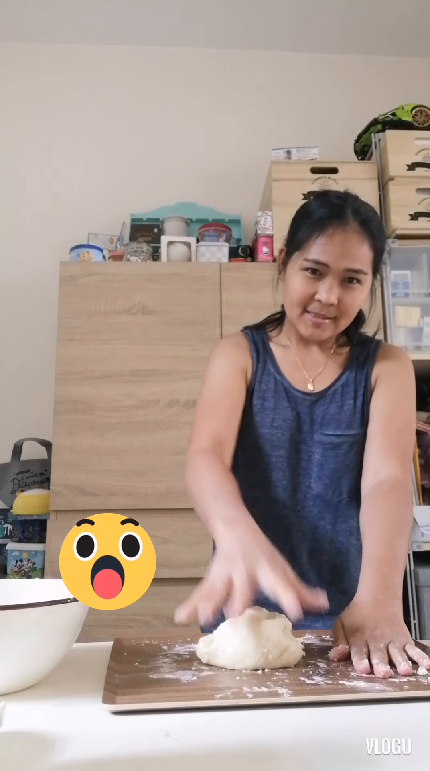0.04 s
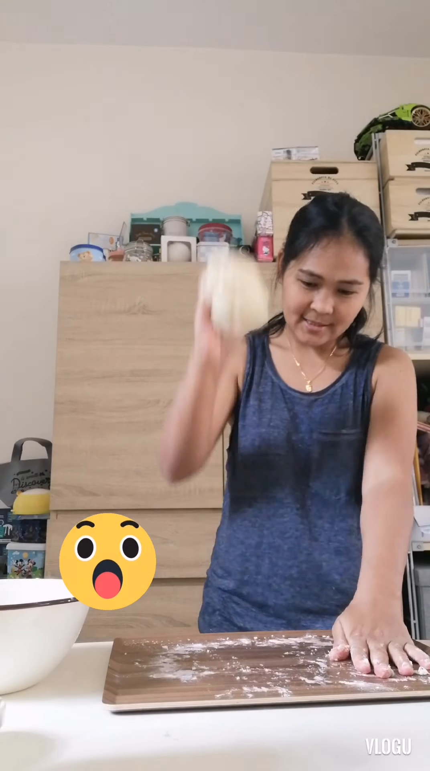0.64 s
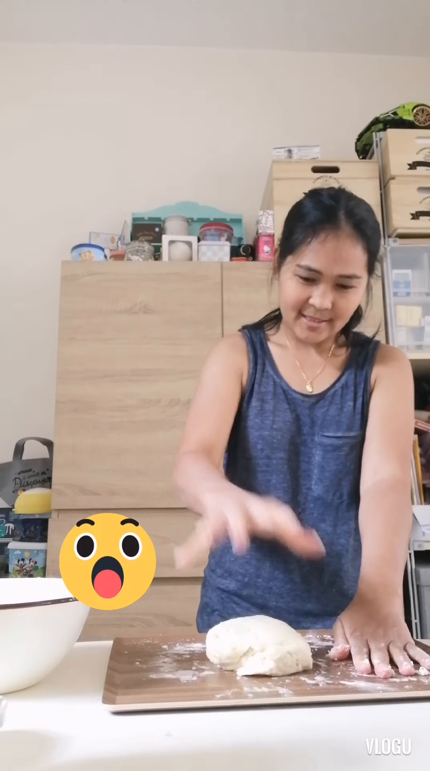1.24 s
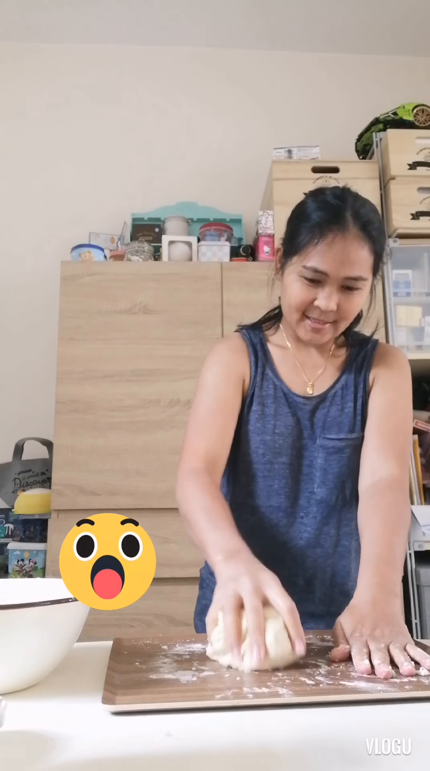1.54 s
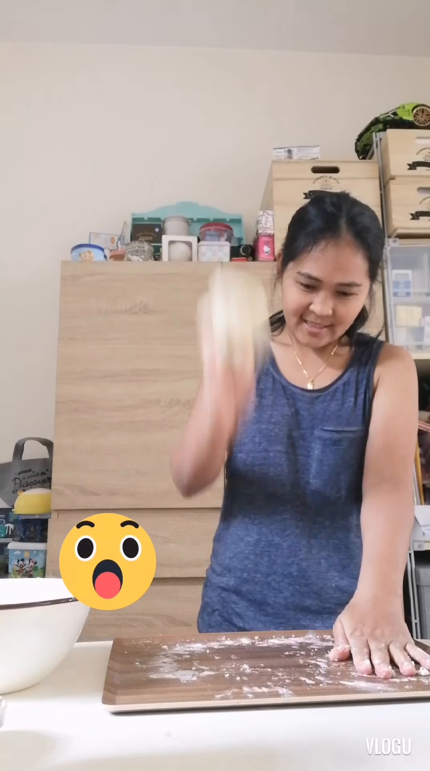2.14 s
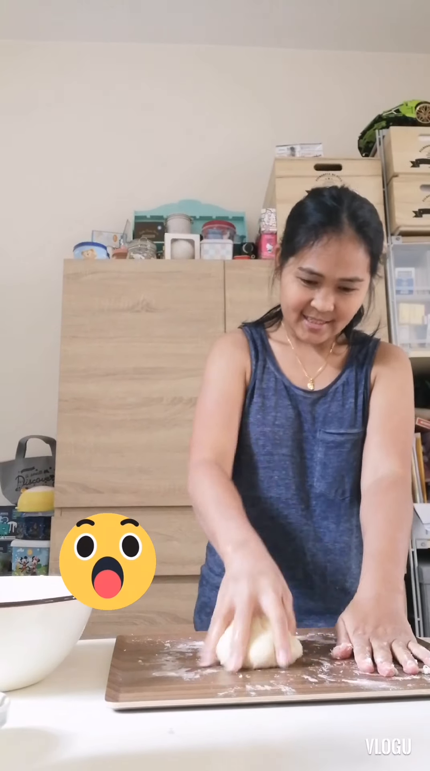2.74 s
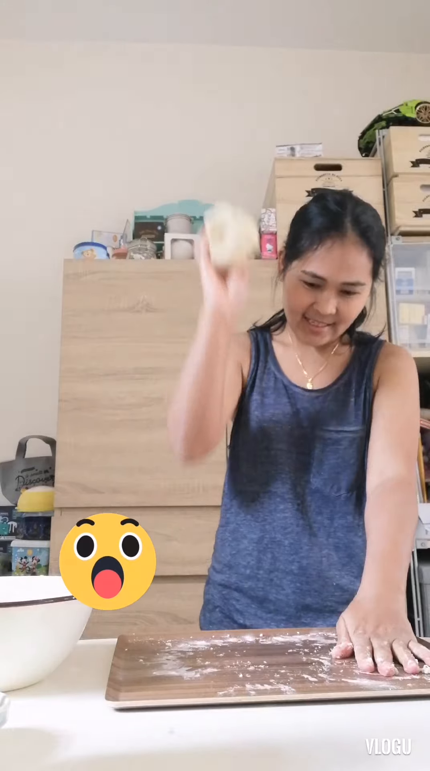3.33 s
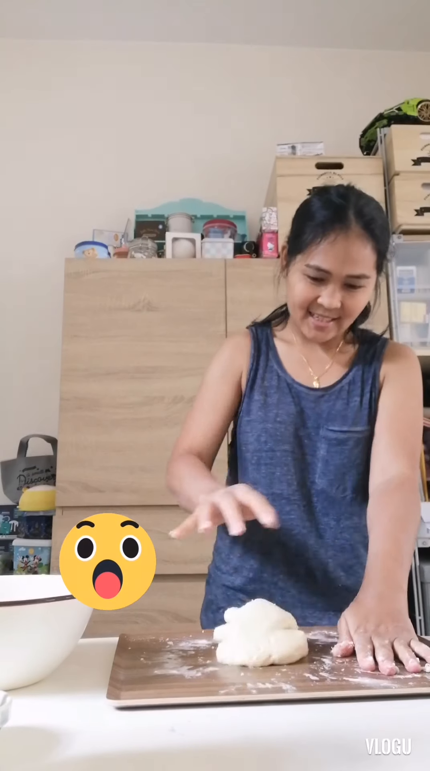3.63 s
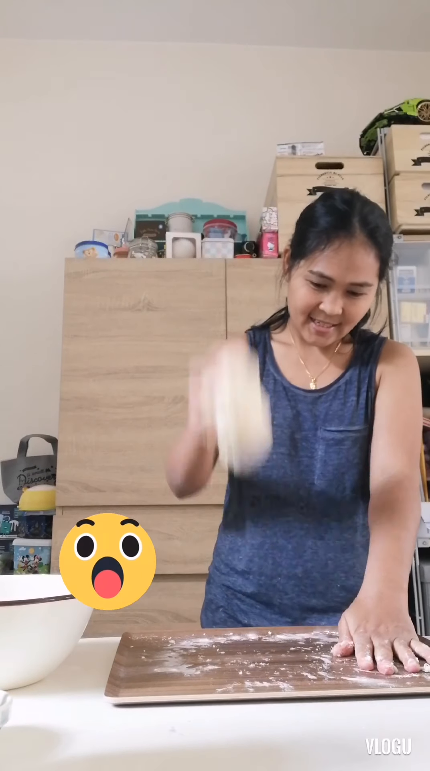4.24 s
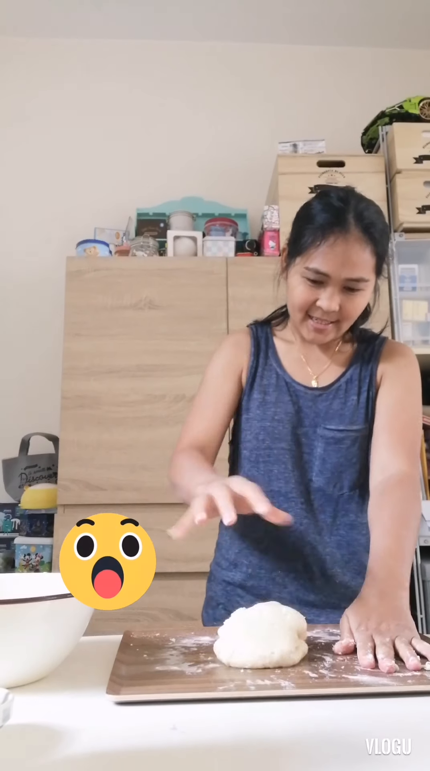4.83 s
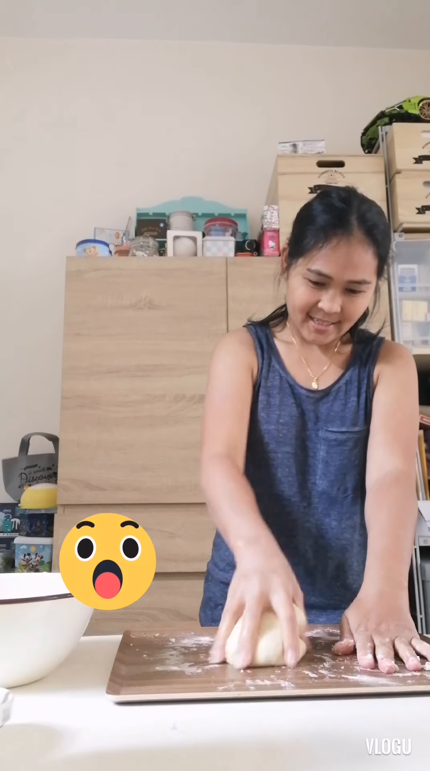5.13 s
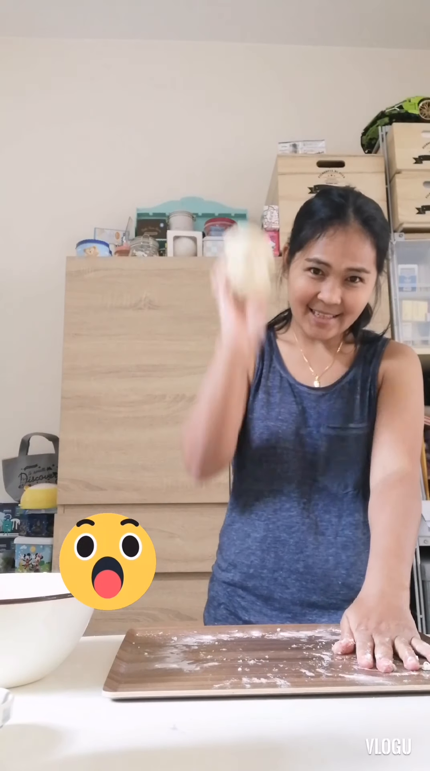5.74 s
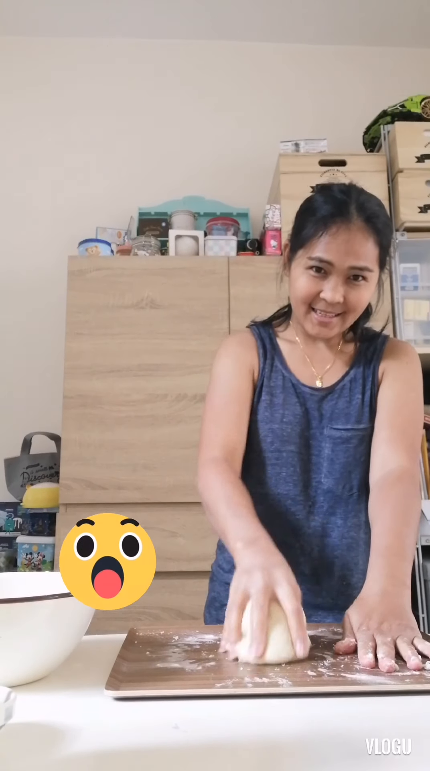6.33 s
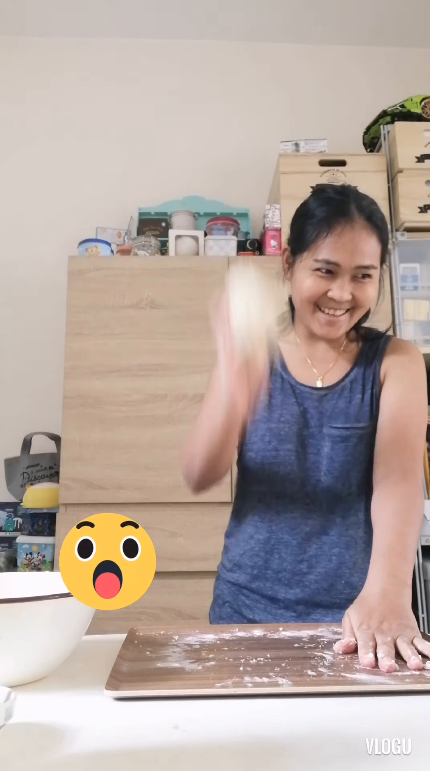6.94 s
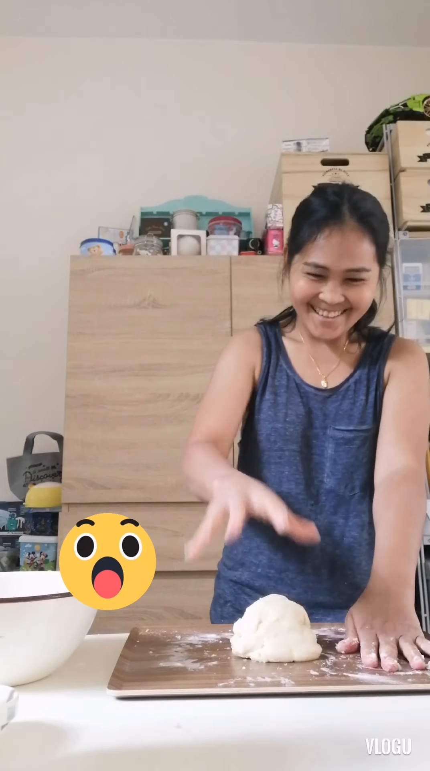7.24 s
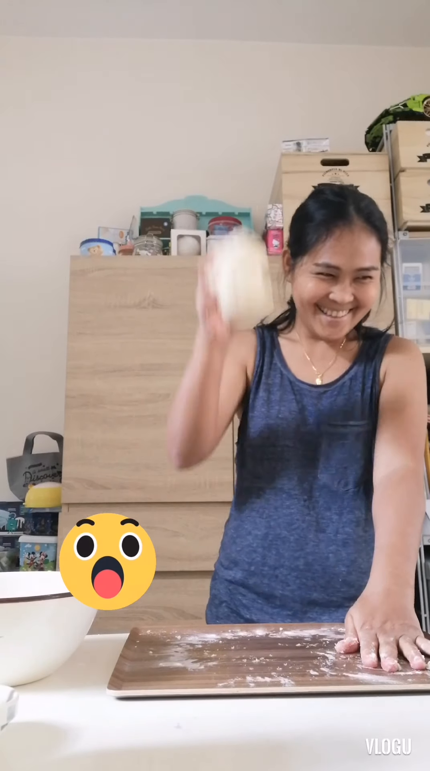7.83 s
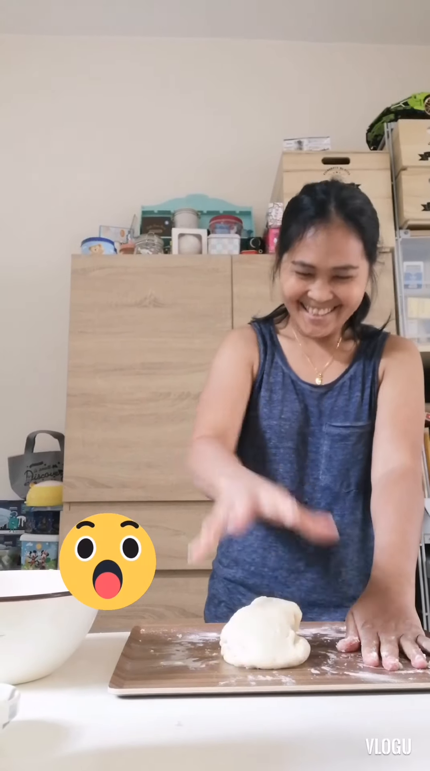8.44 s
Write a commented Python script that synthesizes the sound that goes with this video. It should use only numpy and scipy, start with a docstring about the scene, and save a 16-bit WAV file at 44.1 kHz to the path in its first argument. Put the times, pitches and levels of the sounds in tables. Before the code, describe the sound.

Sharp, heavy slaps of dough hit a wooden board about once a second, with faint sticky peeling between throws.

```python
"""A hard-walled kitchen, a phone microphone close to a floured wooden board, over low murmur, hum and hiss.
A lump of soft dough is thrown down about every 1.2 s. Each slap is a crack of trapped air plus a heavy
push that rings board, table and, faintly, a mixing bowl; the room answers and the input overloads.
Between throws the fingers grip the dough and peel it off, now and then knocking the board."""
import sys
import numpy as np
from scipy import signal
from scipy.fft import rfft, irfft
from scipy.io import wavfile

SR = 44100
rng = np.random.default_rng(int(sys.argv[2]) if len(sys.argv) > 2 else 0)


def master_out(mix):
    """Clip the mix to full scale and print it as 16-bit PCM to the path in sys.argv[1]."""
    frames = np.transpose(np.atleast_2d(mix))
    ceiling = np.clip(frames, -1, 1)
    pcm = np.round(ceiling * 32767).astype(np.int16)
    wavfile.write(sys.argv[1], SR, pcm)


N = 373527
LEAD = SR // 2  # samples of run-up before the start

# Landings of the dough, the first just before the start:
# start_s, crack_db, push_db, crack_tilt_db_per_octave, thud_tilt_db_per_octave, bowl_db
THROWS = [(-0.135, -6, -9, 2, 0.5, -54.5), (1.1421, -5, -12, 2.5, 1, -53.5),
          (2.3499, -4, -9, 2.5, 0.5, -45.5), (3.595, -6, -9.5, 1.5, -0.5, -51.5),
          (4.7877, -6.5, -9.5, 2, 0.5, -47), (5.9853, -7, -11, 1.38, 0, -52.5),
          (7.1371, -4, -13, 2.1, 0, -55.5), (8.308, -6, -11, 1.5, -0.8, -54)]
# The board on its table; the two slow low modes beat: pitch_hz, level_db, t60_s
BOARD_MODES = [(53.6, -2.5, 0.2), (71, -11, 0.66), (78.5, -17.5, 0.41), (104, -3, 0.052),
               (198.5, -1.5, 0.14), (295, 1, .15), (402, -4, 0.067), (442, -7, 0.38), (497.5, -1.5, 0.23),
               (583, -1.5, 0.14), (621.5, 4, 0.17), (660, 1.5, .14), (726, -1, 0.15), (1241, -1, 0.22)]


def amp(db):
    """Decibels to gain."""
    return 10 ** (np.asarray(db) / 20)


def read(points, hz):
    """Join (frequency_hz, value) points on a log-frequency axis."""
    corner_hz, value = np.transpose(points)
    return np.interp(np.log(np.maximum(hz, 1)), np.log(corner_hz), value)


def unit(x):
    """Scale to unit energy."""
    return x / np.sqrt(np.sum(x ** 2))


def burst(x, db):
    """Scale a short sound to the energy of 30 ms at this level."""
    return unit(x) * amp(db) * np.sqrt(0.03 * SR)


def add(track, start_s, x):
    """Mix a sound into a track that begins with the run-up."""
    i = max(LEAD + int(start_s * SR), 0)
    track[i:i + len(x)] += x[:len(track) - i]


def colour(x, spectrum, tilt_db=0, size=4096):
    """Minimum-phase filter with this spectrum, tilted by tilt_db per octave around 2 kHz."""
    hz = np.maximum(np.fft.rfftfreq(size, 1 / SR), 20)
    gain = amp(read(spectrum, hz) + tilt_db * np.log2(hz / 2000))
    cepstrum = irfft(np.log(gain))
    cepstrum[1:size // 2] *= 2
    cepstrum[size // 2 + 1:] = 0
    response = irfft(np.exp(rfft(cepstrum)))
    return signal.fftconvolve(x, response)[:len(x)]


def swell(t, peak_s, rise_s, hold_s, fade_s):
    """Exponential rise up to peak_s, hold, fade."""
    rising, fading = (peak_s - t) / rise_s, (t - peak_s - hold_s) / fade_s
    return np.exp(-np.maximum(np.maximum(rising, fading), 0))


def room_tone(noise_db=-61):
    """Steady room murmur and microphone hiss, with a faint, slightly wandering motor hum."""
    # Still room and microphone hiss: frequency_hz, relative_db
    noise_spectrum = [(15, -34), (25, -2), (49, -11), (75, -4), (98, -11), (125, -4.5), (164, -4.5),
                      (246, -16), (281, -10), (305, -16), (871, -21), (1020, -27), (1110, -25), (1620, -32),
                      (5280, -38), (8000, -32), (9100, -26), (10200, -35), (15500, -42)]
    # Motor tones: pitch_hz, level_db
    motor_tones = [(119, -68.5), (166, -74.5)]
    t, hum = np.arange(N) / SR, 0
    for hz, db in motor_tones:
        phase_drift = 0.0066 * np.cumsum(rng.standard_normal(N))
        hum += amp(db) * np.sqrt(2) * np.sin(2 * np.pi * hz * t + phase_drift)
    noise = colour(rng.standard_normal(N), noise_spectrum)
    return amp(noise_db) * np.sqrt(N) * unit(noise) + hum


def ticking(per_s=55, level_db=-74):
    """The hiss ticks faintly and irregularly in the high treble."""
    # One tick: frequency_hz, relative_db
    tick_spectrum = [(4000, -34.5), (7000, -10), (9000, 1), (11000, -1.5), (15000, -14.5)]
    ticks = 1.0 * (rng.random(N) < per_s / SR)
    return amp(level_db) * np.sqrt(N) * unit(colour(ticks, tick_spectrum))


def wall_reflections(build_s=0.0039):
    """Dense reflections off hard walls build up quickly and die band by band; unit energy."""
    # Kitchen reverberation: frequency_hz, t60_s
    decay_times = [(60, 0.26), (160, 0.29), (420, 0.25), (1100, 0.37), (2900, .42), (6000, 0.45),
                   (8000, 0.33), (11000, 0.34), (16000, 0.03)]
    t, hz = np.arange(SR) / SR, np.fft.rfftfreq(SR, 1 / SR)
    centres_hz = np.geomspace(40, 18000, 20)
    noise, tail = rfft(rng.standard_normal(SR)), 0
    for centre, weights in zip(centres_hz, np.eye(len(centres_hz))):
        band = irfft(noise * read(np.c_[centres_hz, weights], hz), SR)
        tail += band * np.exp(-np.log(1000) * t / read(decay_times, centre))
    return unit(tail * (1 - np.exp(-t / build_s)))


def sticky_crackle(count, grain_db, tilt_db):
    """Tiny sticky bonds of uneven size snap in a dense stream; rms 1."""
    # Peeling dough: frequency_hz, relative_db
    peel_spectrum = [(200, -11), (700, 2), (1500, -1), (3500, -4), (6000, 5), (9000, -2.5), (15000, -7)]
    snaps = rng.standard_normal(count) * (rng.random(count) < 0.25)
    sizes = amp(grain_db * np.minimum(rng.exponential(size=count), 4))
    return unit(colour(snaps * sizes, peel_spectrum, tilt_db)) * np.sqrt(count)


def fingers_on_dough(rub_db=-9, slide_db=-60.5, slips_per_s=30, slip_db=0.5, snap_s=0.0017):
    """Fingers sink in and rub; the dough peels off with a snap, then slides from the hand as it lands."""
    # Pick-ups of the dough: tear_s, tear_db, held_s, press_db, snap_db
    pickups = [(.532, -60.5, 0.17, -54, -63), (1.7795, -55.5, 0.16, -54.5, -57),
               (3.041, -60, 0.22, -54.5, -59), (4.228, -58.5, .07, -56, -64),
               (5.441, -54.5, .17, -53, -60.5), (6.564, -56, .13, -57, -61), (7.72, -53, 0.148, -54.5, -65)]
    # A bond letting go: frequency_hz, relative_db
    snap_spectrum = [(300, -14), (1500, -11.5), (3800, -14), (6000, 1.5), (9000, -8.5), (15000, -16)]
    t, snap_t = np.arange(-LEAD, N) / SR, np.arange(SR // 10) / SR
    pressing, rubbing, peeling, snaps = np.zeros((4, len(t)))
    for tear_s, tear_db, held_s, press_db, snap_db in pickups:
        press_s = tear_s - held_s
        pressing += amp(press_db) * swell(t, press_s, rise_s=0.033, hold_s=0, fade_s=0.018)
        rubbing += amp(press_db + rub_db) * swell(t, press_s, rise_s=0.03, hold_s=held_s, fade_s=0.03)
        peeling += amp(tear_db) * swell(t, tear_s, rise_s=0.018, hold_s=0.026, fade_s=0.021)
        snap = rng.standard_normal(len(snap_t)) * np.exp(-snap_t / snap_s)
        add(snaps, tear_s, burst(colour(snap, snap_spectrum), snap_db))
    sliding = sum(swell(t, land_s, rise_s=0.04, hold_s=0, fade_s=0.021) for land_s, *_ in THROWS)
    slip_times = t[::SR // slips_per_s]  # the fingers catch and slip
    rubbing *= amp(slip_db * np.interp(t, slip_times, rng.standard_normal(len(slip_times))))
    touch = np.hypot(pressing + amp(slide_db) * sliding, rubbing)
    gripping = touch * sticky_crackle(len(t), grain_db=1, tilt_db=0.33)
    tearing = peeling * sticky_crackle(len(t), grain_db=3, tilt_db=-1.1)
    return gripping + tearing + snaps


def ring(modes, t, scatter_db):
    """Struck modes decay; where the blow lands changes the share of each."""
    shares_db = scatter_db * rng.standard_normal(len(modes))
    ringing = 0
    for k, (hz, db, t60_s) in enumerate(modes):
        decay = np.exp(-np.log(1000) * t / t60_s)
        ringing += (-1) ** k * amp(db + shares_db[k]) * np.sin(2 * np.pi * hz * t) * decay
    return ringing


def contact(t, spread_s, splatter_db):
    """One sharp impact, then a splatter of small ones as the contact spreads."""
    splatter = unit(rng.standard_normal(len(t)) * np.exp(-t / spread_s))
    return (t == 0) + amp(splatter_db) * splatter


def board_knocks(wood_db=-12, hand_damping_s=0.023, nearby_db=-8, scatter_s=0.018):
    """Dry taps on the board, damped by the hand and scattered by the things on the table."""
    # Light knocks as the dough is picked up: start_s, level_db
    taps = [(2.759, -63), (2.956, -67), (4.168, -65.5), (5.4393, -37), (6.6929, -70.5)]
    # One knock: frequency_hz, relative_db
    knock_spectrum = [(80, -23), (180, -12), (320, 4), (750, 2), (1300, 0), (2200, 0), (3300, -7),
                      (4500, -15), (8000, -24.5), (15000, -41)]
    track, t = np.zeros(LEAD + N), np.arange(SR // 4) / SR
    for start_s, level_db in taps:
        nearby = amp(nearby_db) * unit(rng.standard_normal(len(t)) * np.exp(-t / scatter_s))
        wood = amp(wood_db) * unit(ring(BOARD_MODES, t, scatter_db=5) * np.exp(-t / hand_damping_s))
        tap = contact(t, spread_s=0.0045, splatter_db=-1)
        add(track, start_s, burst(colour(tap + nearby + wood, knock_spectrum), level_db))
    return track


def air_swing(t, width_s=0.0024, delay_s=0.007):
    """The lump flattens within some ten milliseconds and shoves out one slow swing of air."""
    u = (t - delay_s) / width_s
    return -u * np.exp(-u ** 2 / 2)


def dough_slaps(board_db=-6, swing_db=-7):
    """Each landing cracks and thuds into the room, shoves the air and rings the board and bowl."""
    # Air squeezed out from under the dough: frequency_hz, relative_db
    crack_spectrum = [(60, -10.5), (150, -2), (300, 0.5), (650, 6), (1000, 5), (1600, 3), (2400, 2.5),
                      (3600, -2.5), (5000, -2.5), (8500, -6), (11000, -13.5), (16000, -14)]
    # Dull thud of the lump's weight: frequency_hz, relative_db
    thud_spectrum = [(25, -20), (55, -11), (78, -7.5), (110, -0.5), (200, -3.5), (320, 1), (480, -0.5),
                     (700, -0.5), (1000, -6.5), (2000, -23), (6000, -43.5)]
    # The mixing bowl beside the board: pitch_hz, level_db, t60_s
    bowl_modes = [(378.5, 0, 2.1), (1077, -13, 2.1)]
    track, t = np.zeros(LEAD + N), np.arange(2 * SR) / SR
    impact = 1.0 * (t == 0)
    for start_s, crack_db, push_db, crack_tilt, thud_tilt, bowl_db in THROWS:
        # dough and cook are never twice in the same place, so each throw has its own reflections
        walls = np.pad(wall_reflections(), (0, SR))
        crack = amp(-7) * contact(t, spread_s=0.005, splatter_db=1) + amp(-2) * walls
        thud = amp(-1) * impact + amp(-3) * walls
        add(track, start_s, burst(colour(crack, crack_spectrum, crack_tilt), crack_db))
        add(track, start_s, burst(air_swing(t), push_db + swing_db))
        add(track, start_s, burst(colour(thud, thud_spectrum, thud_tilt), push_db))
        add(track, start_s, burst(ring(BOARD_MODES, t, scatter_db=1), push_db + board_db))
        add(track, start_s, amp(bowl_db) * ring(bowl_modes, t, scatter_db=1))
    return track


def in_room(x, walls, direct_db, room_db):
    """A sound reaches the microphone directly and by way of the walls."""
    return amp(direct_db) * x + amp(room_db) * signal.fftconvolve(x, walls)[:len(x)]


def microphone_port(x, centre_hz=6080, width_hz=800, resonance_db=6):
    """The microphone's sound port adds a resonance in the treble."""
    resonator = signal.iirpeak(centre_hz, centre_hz / width_hz, fs=SR)
    return x + amp(resonance_db) * signal.lfilter(*resonator, x)


def scene():
    """The work at the board, close up and in mono, over the room tone."""
    walls = wall_reflections()
    knocks = in_room(board_knocks(), walls, direct_db=2.5, room_db=-7.5)
    fingers = in_room(fingers_on_dough(), walls, direct_db=-1.5, room_db=-15)
    work = microphone_port(dough_slaps() + knocks + fingers)[LEAD:]
    return (work + room_tone() + ticking())[None]


def record(dry, ceiling=0.55, knee=5, bass_cut_hz=15, top_cut_hz=15900):
    """The slaps overload the input, which flattens their peaks; the deepest bass and the top are cut."""
    clipped = dry / (1 + np.abs(dry / ceiling) ** knee) ** (1 / knee)
    bass_cut = signal.butter(2, bass_cut_hz, "high", fs=SR, output="sos")
    top_cut = signal.firwin(255, top_cut_hz, fs=SR)[None]
    return signal.fftconvolve(signal.sosfilt(bass_cut, clipped), top_cut, "same")


dry = scene()
out = record(dry)
master_out(out)
```